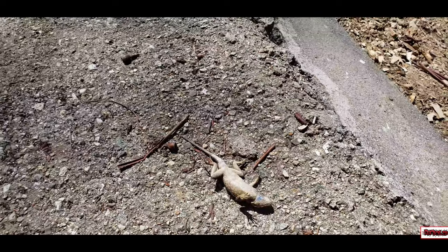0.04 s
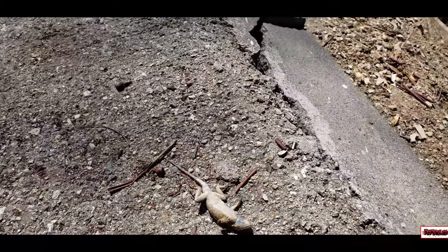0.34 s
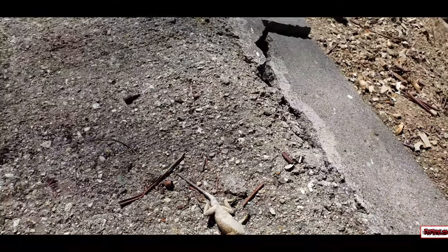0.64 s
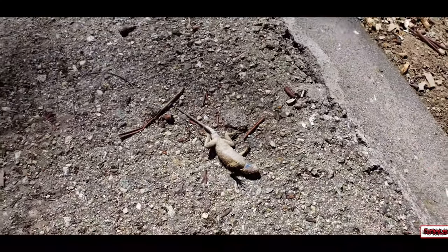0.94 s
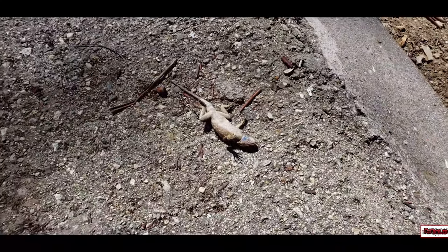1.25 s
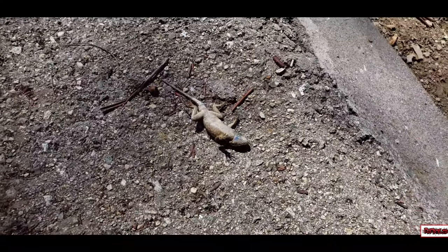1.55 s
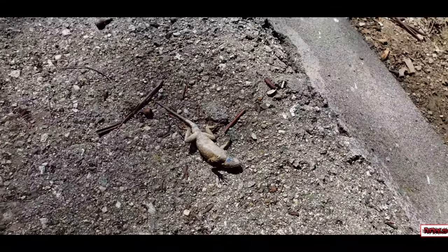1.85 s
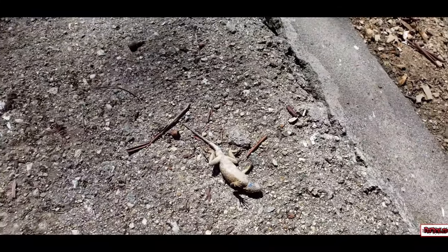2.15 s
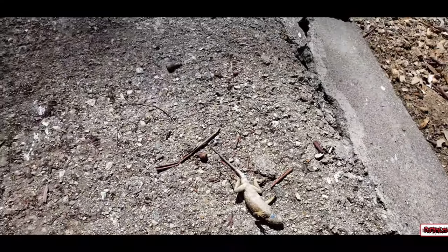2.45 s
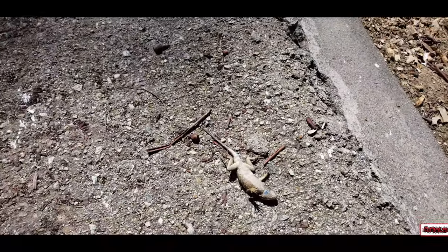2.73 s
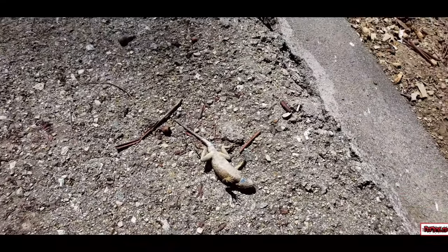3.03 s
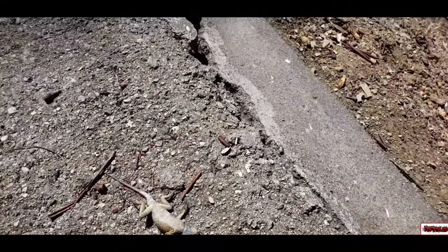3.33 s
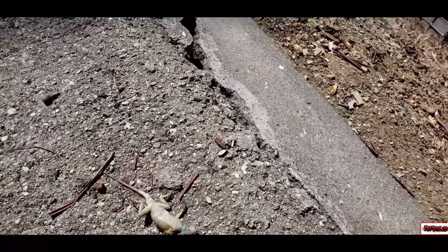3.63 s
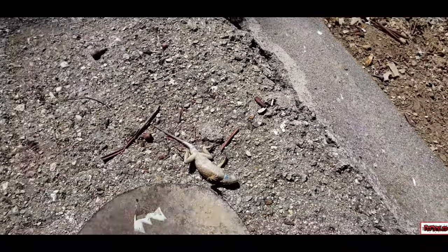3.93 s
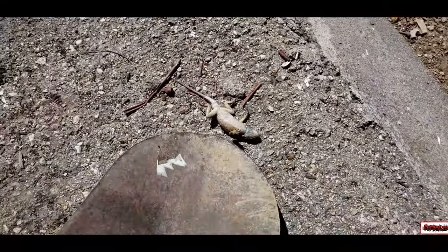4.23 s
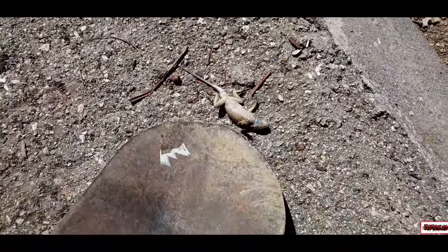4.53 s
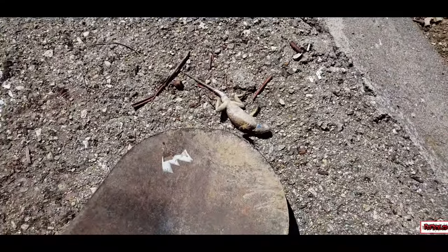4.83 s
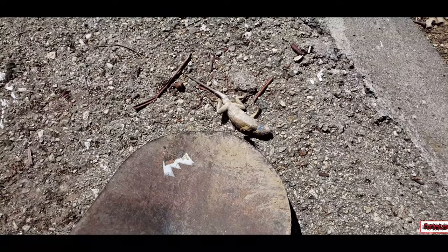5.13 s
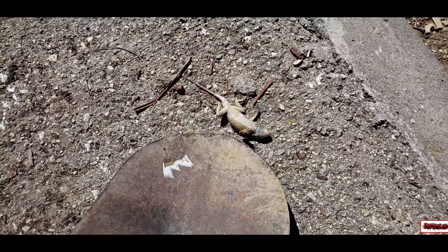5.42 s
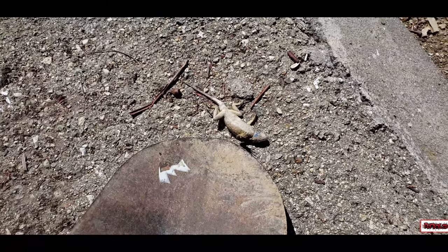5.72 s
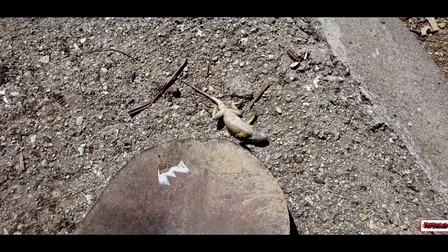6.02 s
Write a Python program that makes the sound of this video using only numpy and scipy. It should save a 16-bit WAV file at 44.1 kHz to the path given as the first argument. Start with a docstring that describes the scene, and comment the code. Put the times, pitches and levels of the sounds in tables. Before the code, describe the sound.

Close, uneven metallic knocks and short gritty scrapes of a shovel shifted on pavement outdoors, with low buffeting underneath.

```python
"""Steel shovel on gravelly pavement

Outdoors, very close to a stereo microphone, a shovel is picked up and shifted over the ground.
Each contact is a short gritty chatter; the harder knocks set the steel ringing until the grip damps it.
Air and handling rumble on the two microphone ports; fingers tick faintly over distant air and hiss."""
import sys
import numpy as np
from scipy import signal
from scipy.fft import rfft, irfft, next_fast_len
from scipy.io import wavfile
from scipy.ndimage import uniform_filter1d

SR = 44100
rng = np.random.default_rng(int(sys.argv[2]) if len(sys.argv) > 2 else 0)


def dump(signal):
    """Clip the signal to [-1, 1] and save it as 16-bit WAV at the path in sys.argv[1]."""
    limited = np.clip(np.atleast_2d(signal).T, -1, 1)
    pcm = np.round(limited * 32767).astype(np.int16)
    wavfile.write(sys.argv[1], SR, pcm)


N = 272097
TIME = np.arange(N) / SR
SIDES = np.array([[.5], [-.5]])   # splits a left-minus-right difference, such as pan_db, over the ports


def from_db(db):
    """Decibels to gain."""
    return 10 ** (np.asarray(db) / 20)


def rms(x):
    """Root mean square."""
    return np.sqrt(np.mean(x ** 2) + 1e-20)


def at_hz(points, hz):
    """Read a table on a log-frequency axis."""
    freqs, values = np.transpose(points)
    return np.interp(np.log(np.maximum(hz, 1)), np.log(freqs), values)


def add(track, start_s, sound):
    """Mix a stereo sound in at start_s."""
    start = int(start_s * SR)
    track[:, start:start + sound.shape[1]] += sound[:, :N - start]


def noise(colour):
    """Noise of rms 1, coloured by rows of freq_hz, gain_db."""
    size = next_fast_len(N)
    gain = from_db(at_hz(colour, np.fft.rfftfreq(size, 1 / SR)))
    x = irfft(rfft(rng.standard_normal(size)) * gain, size)[:N]
    return x / rms(x)


def noise_pair(colour):
    """Independent noise for left and right."""
    return np.array([noise(colour), noise(colour)])


# Outdoor air, far off: freq_hz, gain_db
AIR_COLOUR = [(100, -9), (400, 2), (750, 2.5), (1000, -5.5), (1600, -5), (2500, -38), (5000, -18.5)]
# Self-noise of each side of the microphone: freq_hz, gain_db
LEFT_HISS_COLOUR = [(500, -37), (2000, -8), (4500, -16.5), (6500, -17), (8000, -5.5), (9200, -1.5),
                    (10500, -11.5), (13000, -9.5), (15300, -9), (16500, -52)]
RIGHT_HISS_COLOUR = [(500, -23.5), (2000, -6.5), (4500, -14.5), (6500, -26), (8000, -65), (9200, -17),
                     (10500, -24), (13000, -11), (15000, -7), (16500, -43)]


def air_and_hiss(air_db, hiss_db):
    """Distant air reaches both ports alike; each adds its own hiss."""
    hiss = from_db(hiss_db)[:, None] * np.array([noise(LEFT_HISS_COLOUR), noise(RIGHT_HISS_COLOUR)])
    return hiss + from_db(air_db) * noise(AIR_COLOUR)


def turbulence(colour, shared, steady_s, lumpy_db):
    """Air in quick lumps, partly shared by the two ports, evened out over steady_s."""
    flow = np.sqrt(shared) * noise(colour) + np.sqrt(1 - shared) * noise_pair(colour)
    flow *= from_db(lumpy_db * noise([(15, 7.5), (30, -6.5), (100, -93), (250, -120)]))
    return flow / np.sqrt(uniform_filter1d(flow ** 2, int(steady_s * SR)) + 1e-9)


# Air and handling right on the microphone: time_s, level_db
BUFFET_LEVEL = [(0.0, -25), (0.07, -45), (0.26, -30), (0.29, -46), (0.34, -36.5), (0.57, -42.5),
                (0.76, -38), (0.82, -52), (0.86, -36.5), (0.95, -52), (1.12, -28.5), (1.15, -41),
                (1.27, -33), (1.36, -54.5), (1.7, -51), (1.74, -43), (1.96, -48.5), (2.37, -38),
                (2.4, -29.5), (2.44, -43.5), (2.65, -39.5), (3.02, -51), (3.06, -34), (3.16, -32.5),
                (3.2, -39), (3.28, -30), (3.54, -49), (3.57, -42.5), (4.23, -43.5), (4.54, -36),
                (4.57, -46.5), (4.88, -49.5), (4.98, -35), (5.02, -47.5), (5.21, -30.5), (5.4, -37),
                (5.52, -47.5), (5.55, -28), (5.67, -44), (6.17, -53)]
# Which port takes more of the rumble: time_s, pan_db
BUFFET_PAN = [(0, 7), (.45, -6), (.75, 0), (2, -4.5), (2.9, 6), (3.15, -4), (3.7, -1), (4.1, -6.5),
              (4.7, 0.5), (5.2, -11), (5.6, -0.5), (6.15, -3)]
# The deep rumble and the flutter above it: freq_hz, gain_db
RUMBLE_COLOUR = [(10, -58), (20, 5), (45, -4.5), (72, 9), (92, 5.5), (125, 2), (165, -1), (220, -10),
                 (330, -28.5), (800, -56), (2500, -100)]
FLUTTER_COLOUR = [(130, -16.5), (230, -1), (335, -3), (450, -11.5), (620, -13), (1000, -29), (2000, -51.5),
                  (4000, -76.5)]


def buffeting(rumble_trim_db, eddy_db, flutter_db, flutter_pan_db):
    """Moving air and handling rumble on the ports, each in its own eddies, under a lighter flutter."""
    level_db = np.interp(TIME, *np.transpose(BUFFET_LEVEL))
    pan_db = np.interp(TIME, *np.transpose(BUFFET_PAN))
    swirl_db = eddy_db * noise_pair([(2, -12), (7, 0), (14, -8), (40, -60), (100, -120)])
    rumble = turbulence(RUMBLE_COLOUR, shared=0.24, steady_s=0.0577, lumpy_db=6.0)
    rumble *= from_db(rumble_trim_db + level_db + swirl_db + pan_db * SIDES)
    swing_db = level_db + 39.5   # about the usual level; the flutter follows only part of it
    flutter = turbulence(FLUTTER_COLOUR, shared=0.3, steady_s=0.093, lumpy_db=3.0)
    flutter *= from_db(flutter_db + 0.76 * swing_db + flutter_pan_db * SIDES)
    return rumble + flutter


# Light rattling and dragging between the blows: start_s, length_s, level_db, treble_db
RATTLE_RUNS = [(0.018, 0.059, -70.5, 18), (0.369, 0.18, -64.5, 8.5), (2.012, 0.12, -56, -3.5),
               (2.208, 0.068, -51, -8), (2.516, .27, -56, 3.5), (2.931, .125, -51.5, -4),
               (6.034, 0.12, -62.5, 8.5)]


def rattle_touches(per_s=60, touch_s=.018, damping_s=0.021, spread_db=3.5, fade_db=5.5):
    """A rattle is an uneven run of light touches that swells and fades; returns contact rows."""
    rows = []
    for start_s, length_s, run_db, treble_db in RATTLE_RUNS:
        count = max(1, round(length_s * per_s))
        for k, (late, force, edge) in enumerate(rng.uniform(-1.1, 1, (count, 3))):
            progress = (k + (1 + late) / 2) / count
            at_s = start_s + length_s * progress
            level_db = run_db + spread_db * force - fade_db * (2 * progress - 1) ** 2
            rows.append((at_s, touch_s, damping_s, level_db, treble_db + spread_db * edge))
    return rows


# Brief modes of the blade that every contact excites: pitch_hz, level_db, t60_s
BRIEF_MODES = [(712, 9, .12), (892, 7, .15), (999, 13, .13), (1118, 8, .2), (1394, 8, .17), (1822, 9, .14),
               (2010, 3, .25), (2335, 7, .1), (2420, 8, .1), (3205, 3, .2), (3550, 6, .1), (3690, 3, .17),
               (4226, 2, .17), (4761, 6, .16), (5013, 5, .12), (5100, 7, .11), (5905, -4, .15),
               (6540, 2, .12), (7170, 4, .15), (7450, 3, .13), (7691, 6, .12), (8703, 5, .1),
               (9605, 9, .09), (10030, 7, .08), (10400, 6, .09), (12417, 6, .07), (13527, 6, .07),
               (14325, 7, .07), (15043, 7, .07), (15111, 7, .07)]
# Colour of the dense modes between them: pitch_hz, level_db
DENSE_COLOUR = [(500, 6), (600, -11), (720, 4.5), (1140, 5.5), (1450, 3.5), (1700, 4.5), (2150, 0),
                (2400, 7), (2700, -8), (3400, 12), (4000, 3.5), (7000, -4), (11500, -0.5), (15000, 11.5)]
# Decay of the dense modes: pitch_hz, t60_s
DENSE_DECAY = [(600, 0.06), (1500, 0.076), (3000, 0.083), (6000, 0.052), (10000, 0.04), (15000, 0.013)]


def blade_modes(size, spread_rad, count=480):
    """The blade's fast-dying modes; above the bass each reaches the two ports with its own phase."""
    t = np.arange(size, dtype=np.float32) / SR
    dense_hz = np.linspace(np.sqrt(420), np.sqrt(15600), count) ** 2
    dense_hz *= 1 + rng.uniform(-1, 1, count) / count
    dense_db = at_hz(DENSE_COLOUR, dense_hz) + rng.normal(0, 1.5, count)
    brief_hz, brief_db, brief_t60_s = np.transpose(BRIEF_MODES)
    hz = np.r_[dense_hz, brief_hz]
    height = from_db(np.r_[dense_db, brief_db]) * hz ** (1 / 4)   # sparser modes are taller
    t60_s = np.r_[at_hz(DENSE_DECAY, dense_hz), brief_t60_s]
    apart_rad = rng.normal(0, 1, len(hz)) * spread_rad * np.minimum(hz / 3300, 1) ** 2
    port_gains = height * np.exp(1j * np.outer([1, -1], apart_rad))
    decay = np.exp(np.outer(-np.log(1000) / t60_s, t).astype(np.float32))
    phase = np.outer(2 * np.pi * hz, t).astype(np.float32)
    return port_gains, decay * np.cos(phase), decay * np.sin(phase)


def chatter(length_s, size, grit_db, slips_per_s=1500):
    """The force of a first touch, then of tiny slips over grit while the contact lasts."""
    slips = (rng.random(size) < slips_per_s / SR) & (np.arange(size) < length_s * SR)
    force = slips * rng.standard_normal(size) * from_db(grit_db)
    force[0] = 1
    return force


# Steel striking and scraping the pavement, very close; treble_db is the high band over the low:
# start_s, length_s, damping_s, level_db, treble_db
GROUND_CONTACTS = [(0.123, 0.011, 0.033, -47, 14.5), (.132, 0.027, 0.035, -43, 10),
                   (.167, 0.031, 0.14, -35, 11.5), (0.219, 0.045, 0.029, -50.5, 4.5),
                   (.268, 0.012, 0.017, -30, 4), (0.294, 0.023, 0.029, -49, 20),
                   (0.335, 0.036, 0.064, -51.5, -3.5), (.63, 0.018, 0.066, -56, 7.5),
                   (1.265, 0.0041, 0.021, -29.5, 3), (1.272, 0.0061, 0.012, -24, 7.5),
                   (1.284, 0.0096, 0.29, -25.5, 6.5), (1.377, .004, 0.014, -50, 3.5),
                   (1.656, 0.0068, 0.095, -62, -8), (1.84, 0.015, 0.03, -56, 10),
                   (1.861, 0.0084, 0.01, -33, 7.5), (1.876, 0.018, .13, -33.5, -10),
                   (1.895, 0.02, 0.042, -45, 7), (2.198, 0.013, .05, -49.5, 3),
                   (2.281, 0.0039, 0.065, -51, 7.5), (2.419, 0.0064, 0.031, -35, 19.5),
                   (2.429, 0.033, 0.013, -29, 7), (2.463, 0.012, 0.42, -27.5, 5.5),
                   (2.484, .01, 0.3, -36, -1), (2.58, 0.023, 0.027, -42, -10),
                   (2.672, 0.0055, 0.063, -59.5, 20.5), (2.762, 0.011, 0.046, -70, 17),
                   (2.976, 0.016, 0.047, -38.5, -16), (2.994, 0.012, 0.066, -42.5, -1.5),
                   (3.57, .001, 0.0051, -40.5, -11), (3.601, 0.01, 0.107, -32.5, 18),
                   (3.626, 0.017, 0.25, -37, 2), (4.453, 0.0042, .0079, -21.5, -12.5),
                   (4.458, 0.0038, 0.33, -23, -12.5), (4.506, 0.00525, .0023, -21.5, -17.5),
                   (4.611, 0.027, 0.075, -51, 9), (6.142, 0.03, 0.035, -47.5, 10)]
# Low, middle and high bands of a contact: low_hz, high_hz
BANDS = [(480, 2600), (2600, 8000), (8000, 16000)]


def contacts(band_trim_db, band_pan_db, crack_db, size=10000):
    """Each blow or light touch cracks dryly and drives the blade's modes, mixed by where it lands."""
    out, t = np.zeros((2, N)), np.arange(size) / SR
    port_gains, cosines, sines = blade_modes(size, spread_rad=0.92)
    filters = [signal.butter(order, band, "band", fs=SR, output="sos")
               for order, band in zip((2, 4, 4), BANDS)]
    for start_s, length_s, damping_s, level_db, treble_db in GROUND_CONTACTS + rattle_touches():
        phases = np.exp(2j * np.pi * rng.random(len(sines)))
        weights = (port_gains * phases * from_db(rng.normal(0, 4.6, len(sines)))).astype(np.complex64)
        blade = weights.real @ cosines + weights.imag @ sines
        blade /= rms(blade[:, :SR // 200])
        blade = blade * (1 + 2 * np.exp(-t / damping_s)) / 3   # the contact soaks up most of the ring
        crack = from_db(crack_db) * rng.standard_normal(size) * np.exp(-t / 0.0018)
        force = chatter(length_s, size, grit_db=-3.5)
        scrape = signal.fftconvolve(blade + crack, force[None], axes=1)[:, :size]
        touching = int((length_s + 0.00085) * SR)
        middle_db = treble_db * (0.13 if treble_db > 0 else 0.82)   # dull contacts lose the middle too
        levels_db = level_db + np.array([0, middle_db, treble_db]) + band_trim_db
        for sos, band_db, pan_db in zip(filters, levels_db, band_pan_db):
            band = signal.sosfilt(sos, scrape) * from_db(pan_db * SIDES)
            add(out, start_s, band * from_db(band_db) / rms(band[:, :touching]))
    return out


def ground_scatter(direct, level_db, t60_s):
    """The ground and surroundings scatter a faint tail of each blow back to the microphone."""
    t = np.arange(SR // 2) / SR
    colour = [(400, -12), (1500, 15.5), (4000, -3.5), (8000, -4.5), (15000, -14.5)]
    tails = noise_pair(colour)[:, :len(t)] * from_db(-60 * t / t60_s)
    tails /= np.sqrt(np.sum(tails ** 2) / 2)
    return from_db(level_db) * signal.fftconvolve(direct, tails, axes=1)[:, :N]


# Long modes of the steel: pitch_hz, level_db, free_t60_s, grip_t60_s, pan_db, left_lead_rad
RING_MODES = [(890, -19, .4, .2, 0, 0), (1141, -2, .45, .24, 0, .2), (1659, -3.5, .5, .65, 4.5, -.7),
              (2045, -8, .42, .32, 2, 1.3), (2390, -7, .1, .2, -4, .9), (2803, -9, .35, .18, -3, 1),
              (4762, -11, .16, .3, 3, -1.2), (9191, -14, .09, .2, 0, -1), (3249, -10, .1, .3, -4, -2.7),
              (3660, -19, .3, .3, 0, -.9), (5895, -30, .4, .5, 0, -1), (14594, -1, .09, .2, -2, .4)]
# Knocks, very close. The struck spot favours one pitch, the grip detunes, the turning blade pans:
# start_s, level_db, tilt_db_per_octave, favoured_hz, lift_db, width_octaves, detune_cents,
# ring_factor, free_s, turn_pan_db
RINGING_KNOCKS = [(.169, -41.5, 7.5, 9191, 17, .3, 5.5, 1.1, 0.021, 1),
                  (.277, -40, -3, 2045, 17, 0.108, -5.5, 0.47, 0.13, -4),
                  (1.273, -27.5, 2.5, 14594, 8, .3, 18.5, 0.79, 0.016, 2),
                  (1.289, -34, 4, 2160, 19, 0.95, -5, 1.28, 0.076, -0.5),
                  (1.652, -60.5, 1, 1170, 15, .3, -36, 0.52, .18, 1),
                  (1.862, -34, -8.5, 2045, 15.5, 0.17, -15.5, 0.35, 0.091, -3),
                  (1.911, -63, 3.5, 1760, 18.5, 0.33, -6, 4.4, .4, 0),
                  (2.204, -56, 2.5, 1141, 17.5, 0.43, 8.5, 0.72, 0.035, 3),
                  (2.42, -38, 2.5, 2540, 9.5, 0.25, -0.5, 5.7, .04, -5),
                  (2.463, -20.5, -3.5, 2400, 15.5, 0.1, 9.5, 0.27, .1, -1),
                  (2.466, -28.5, -3.5, 1800, 7.5, 0.24, 2, 0.86, .13, 0.5),
                  (2.59, -53, 3.5, 2200, 21.5, 0.45, -20.5, 1.05, 0.13, -2),
                  (2.937, -65.5, 2, 1141, 23, 0.26, 4.5, 2.5, 0.075, 0),
                  (2.978, -48.5, -3, 1141, 10, 0.29, -30.5, 0.59, 0.073, 0),
                  (2.998, -77, 1.5, 3249, 35.5, 0.13, -13, 6.7, 0.32, 0),
                  (3.602, -30, -0.5, 2380, 16.5, 0.09, -1.5, 0.76, 0.069, -1.5),
                  (3.621, -60.5, 2.5, 2680, 27.5, 0.49, -29.5, 3.23, .48, 4),
                  (4.455, -32.5, -6.5, 1250, 11, 0.43, -4, 1.7, 0.044, -2),
                  (4.508, -42, -4, 1232, 18.5, 0.59, -1, 2.8, 0.12, 0),
                  (6.146, -56.5, -1, 1800, 18.5, 0.41, -2, 0.68, .03, 0)]
# How fast the shifting grip bends and shakes the ring: rate_hz, gain_db
GRIP_WAVER = [(3, -17.5), (12, -1.5), (40, -4.5), (120, -29.5), (400, -100)]


def ringing(rise_s, waver_cents, waver_db, pivot_hz):
    """Knocks set the long modes ringing; they waver in the hand until the tightening grip chokes them."""
    out, t = np.zeros((2, N)), np.arange(SR) / SR
    waver = noise(GRIP_WAVER)
    rise = 1 - np.exp(-t / rise_s)
    for (start_s, level_db, tilt, favoured_hz, lift_db, width_octaves, detune_cents,
         ring_factor, free_s, turn_pan_db) in RINGING_KNOCKS:
        gripped_s = np.maximum(t - free_s, 0)
        for hz, mode_db, free_t60_s, grip_t60_s, pan_db, lead_rad in RING_MODES:
            bend, shake = [waver[start:start + SR] for start in rng.integers(0, N - SR, size=2)]
            spot_db = lift_db * np.exp(-(np.log2(hz / favoured_hz) / width_octaves) ** 2)
            strike_db = level_db + mode_db + tilt * np.log2(hz / pivot_hz) + spot_db
            decay_db = -60 * (t / (free_t60_s * ring_factor) + gripped_s / grip_t60_s)
            envelope = rise * from_db(strike_db + decay_db + waver_db * shake)
            bent_hz = hz * 2 ** ((detune_cents + waver_cents * bend) / 1200)
            cycles = np.cumsum(bent_hz) / SR + rng.random()
            tone = np.sin(2 * np.pi * cycles + lead_rad * SIDES)
            add(out, start_s, tone * envelope * from_db((pan_db + turn_pan_db) * SIDES))
    return out


def finger_ticks(level_db, per_s, decay_s):
    """Fingers shifting their hold make faint high ticks at random moments."""
    ticks = (rng.random(N) < per_s / SR) * from_db(4 * np.minimum(rng.exponential(1, N), 2))
    envelope = signal.lfilter([1], [1, -np.exp(-1 / (decay_s * SR))], ticks + 1e-18)
    colour = [(2500, -7), (7000, -23), (11000, 25), (15000, 5), (16500, -30)]
    return from_db(level_db) * envelope * noise_pair(colour)


def scene():
    """The shovel close up, buffeting on the microphone itself, open air far behind."""
    scrapes = contacts(band_trim_db=(-.5, -.8, -.5), band_pan_db=(-.8, .3, -1.5), crack_db=-20)
    scatter = ground_scatter(scrapes, level_db=-20.5, t60_s=0.41)
    ring = ringing(rise_s=0.00086, waver_cents=4, waver_db=1.3, pivot_hz=1850)
    buffets = buffeting(rumble_trim_db=1.5, eddy_db=2, flutter_db=-50.5, flutter_pan_db=-1.7)
    fingers = finger_ticks(level_db=-64, per_s=7, decay_s=.007)
    background = air_and_hiss(air_db=-62.5, hiss_db=(-61, -64.5))
    return scrapes + scatter + ring + buffets + fingers + background


def record(dry, ceiling=.9, cutoff_hz=15550):
    """The highest peaks are rounded and the top is cut steeply."""
    rounded = np.tanh(dry / ceiling) * ceiling
    return signal.sosfilt(signal.ellip(10, .2, 80, cutoff_hz, fs=SR, output="sos"), rounded)


dry = scene()
out = record(dry)
dump(out)
```